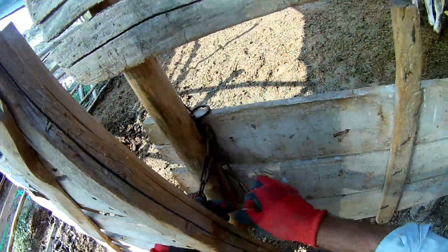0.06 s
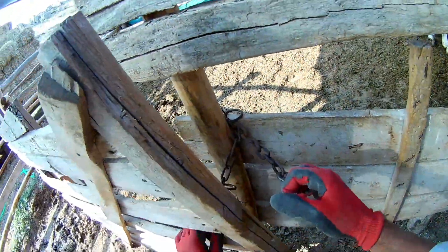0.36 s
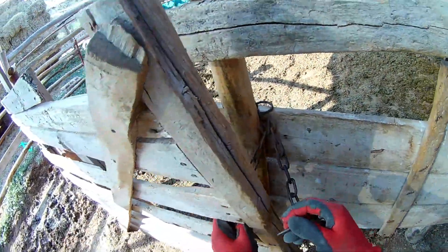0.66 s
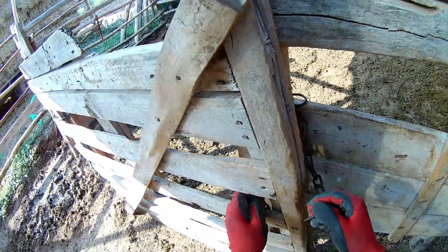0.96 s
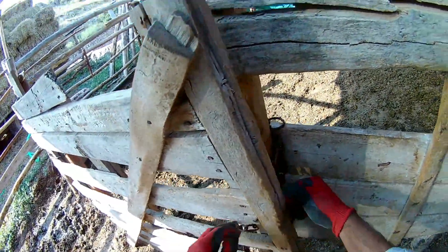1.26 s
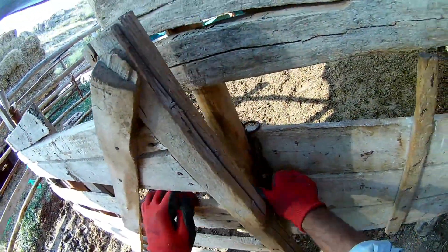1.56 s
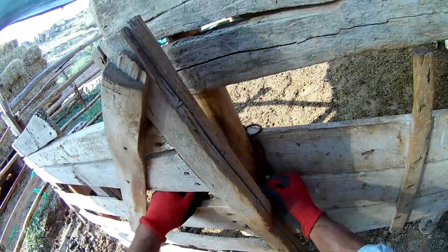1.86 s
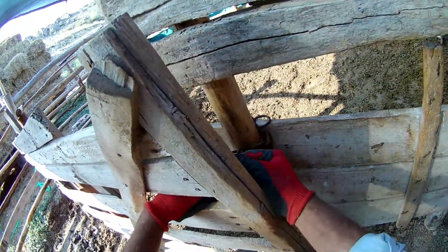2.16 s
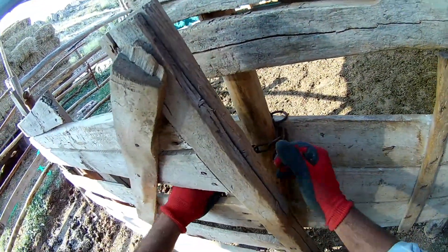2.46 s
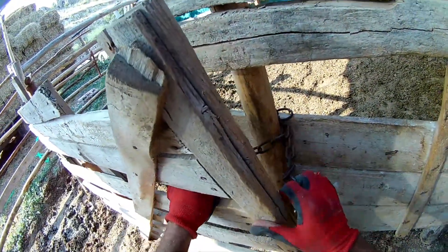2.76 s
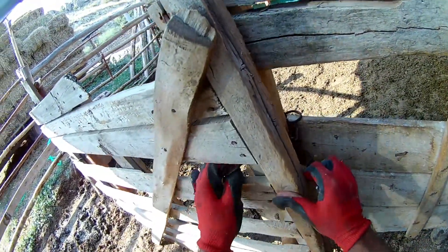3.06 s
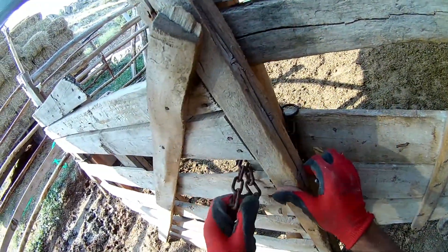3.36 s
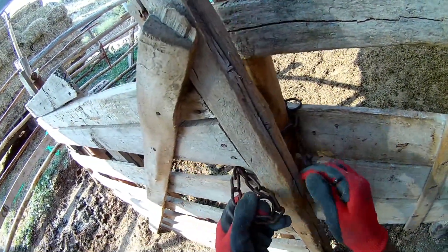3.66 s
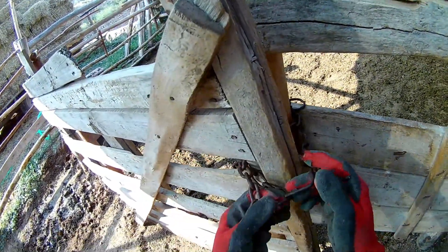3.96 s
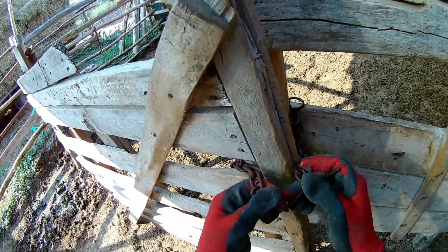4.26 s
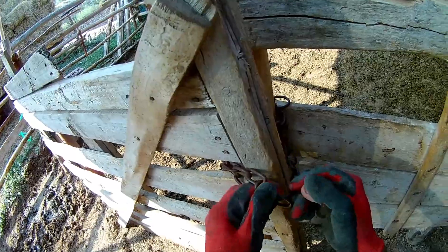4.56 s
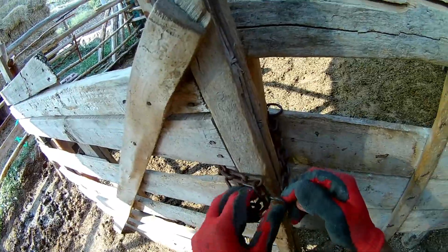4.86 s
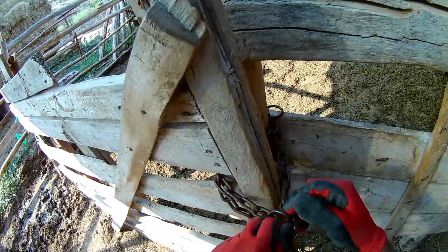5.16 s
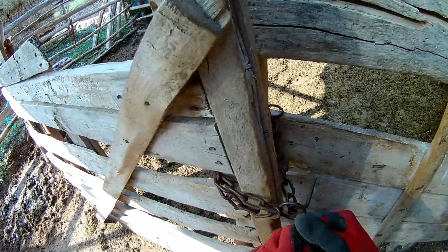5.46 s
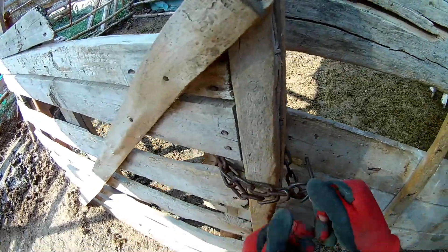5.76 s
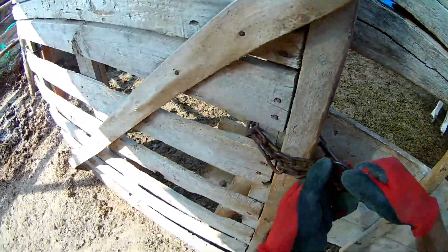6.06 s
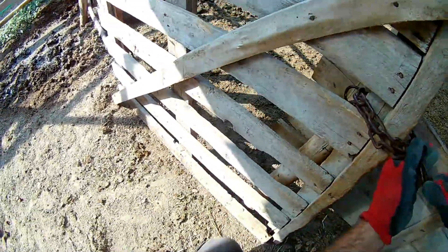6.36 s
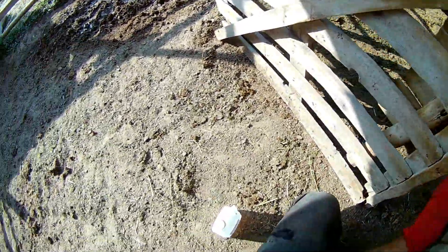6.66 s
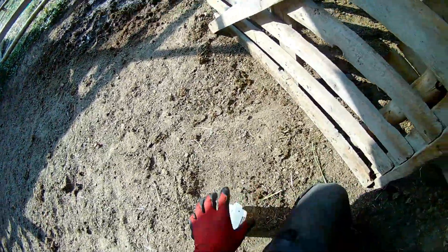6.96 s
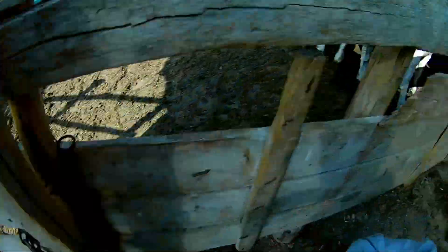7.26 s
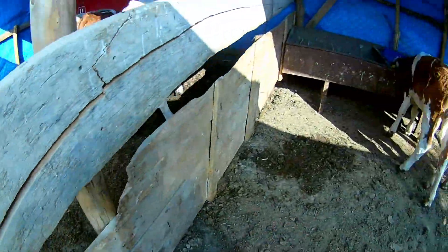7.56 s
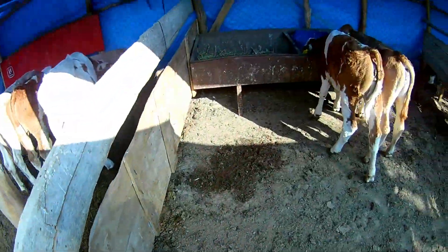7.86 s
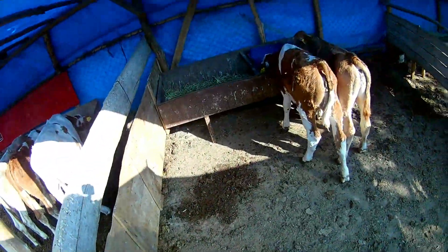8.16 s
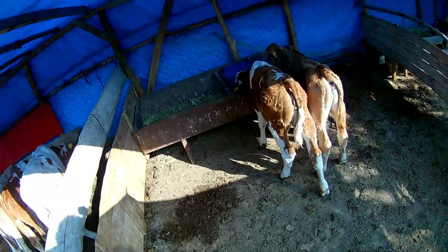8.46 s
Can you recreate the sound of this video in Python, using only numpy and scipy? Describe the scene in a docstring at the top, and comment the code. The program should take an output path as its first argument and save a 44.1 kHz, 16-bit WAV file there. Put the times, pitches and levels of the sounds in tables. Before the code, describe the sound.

Close, irregular clatter of chain links on wooden boards ends in a hook's clank and soft footsteps, over faint birdsong.

```python
"""A plank gate bumps shut in a cattle pen, close by, and a steel chain is threaded through it and hooked.
The links knock and drag on dry, ringing boards and clink on each other while rubber gloves rub.
Metal squeaks once and the hook swings against the gate; then come a few dull steps on earth.
Small birds call in the yard, over a hush, a faint hum, far hoots and puffs of wind on the microphone."""
import sys
import numpy as np
from scipy import signal
from scipy.fft import rfft, irfft
from scipy.io import wavfile
from scipy.ndimage import uniform_filter1d

SR = 44100
rng = np.random.default_rng(int(sys.argv[2]) if len(sys.argv) > 2 else 0)


def wrap_up_sound(samples):
    """Save the sound to the file named by the first command line argument, as 16-bit audio."""
    columns = np.atleast_2d(samples).T
    # keep every value between -1 and 1, then stretch to whole-number steps
    tamed = np.clip(columns, -1, 1)
    steps = np.round(tamed * 32767).astype(np.int16)
    wavfile.write(sys.argv[1], SR, steps)


N = 379304


def amp(db):
    """Decibels to gain."""
    return 10 ** (np.asarray(db) / 20)


def unit_rms(x):
    """Scales to rms 1."""
    return x / np.sqrt(np.mean(x ** 2) + 1e-20)


def unit_peak(x):
    """Scales the loudest two milliseconds to rms 1."""
    return x / np.sqrt(uniform_filter1d(x ** 2, size=88).max() + 1e-20)


def noise(size):
    """White noise."""
    return rng.standard_normal(size)


def decay(t, t60):
    """Envelope that falls 60 dB in t60 seconds."""
    return amp(-60 * t / t60)


def attack(t, rise_s):
    """Envelope that eases up from 0 to 1."""
    return 1 - np.exp(-t / rise_s)


def curve_at(points, hz):
    """Reads a curve on a log-frequency axis."""
    f, value = np.transpose(points)
    return np.interp(np.log(hz + 1), np.log(f + 1), value)


def add(mix, s, sound):
    """Mixes a sound in at time s."""
    part = mix[max(round(s * SR), 0):][:len(sound)]
    part += sound[:len(part)]


def eq(x, points, size=2048):
    """Minimum-phase EQ, so attacks stay sharp."""
    db = curve_at(points, abs(np.fft.fftfreq(size, 1 / SR)))
    log_gain = np.log(amp(np.maximum(db, -100)))
    taps = np.fft.ifft(np.exp(np.conj(signal.hilbert(log_gain)))).real
    return signal.fftconvolve(x, taps)[:len(x)]


def band(x, lo_hz, hi_hz, order=3):
    """Band-pass."""
    return signal.sosfilt(signal.butter(order, [lo_hz, hi_hz], "band", fs=SR, output="sos"), x)


def ringing(modes, t):
    """One dying sine for each row of f/Hz, level/dB, t60/s."""
    hz, db, t60 = np.transpose(modes)[:, :, None]
    return amp(db) * decay(t, t60) * np.sin(2 * np.pi * hz * t)


def dying_noise(t60s, size=12288):
    """Countless weak modes: noise whose bands die at their own speeds."""
    hz, t, spectrum = signal.stft(noise(size), SR, nperseg=256)
    return signal.istft(spectrum * decay(t, curve_at(t60s, hz)[:, None]), SR, nperseg=256)[1][:size]


# EQ of the open-air bed: f/Hz, level/dB
AIR_EQ = [(18, -31), (30, 1), (69, 0.5), (188, -2), (362, -5), (662, -6), (735, -10), (1150, -8.5),
          (1570, -19.5), (2330, -22.5), (2660, -20.5), (7990, -36), (11800, -36.5), (14600, -33),
          (15800, -33.5)]
# partials of the hum: f/Hz, level/dB
HUM_PARTIALS = [(60, -74), (119, -72.5), (183, -70)]
def yard_bed():
    """Open-air hush with a wavering hum of narrow noise bands."""
    hush = amp(-59.5) * unit_rms(eq(noise(N), AIR_EQ))
    hum = sum(amp(db) * unit_rms(band(noise(N), hz - 3, hz + 3, order=2)) for hz, db in HUM_PARTIALS)
    return hush + hum


# hoot cues: t/s, length/s, f/Hz, level/dB
HOOT_CUES = [(5.60, 0.14, 177, -50.5), (6.32, 0.1, 181, -53)]
def hoots():
    """Faint low tones swell and fade far off."""
    out = np.zeros(N)
    for s, length, hz, db in HOOT_CUES:
        t = np.arange(int(length * SR)) / SR
        add(out, s, amp(db) * np.sin(np.pi * t / length) * np.sin(2 * np.pi * hz * t))
    return out


# wind cues: t/s, length/s, level/dB
PUFF_CUES = [(0.785, 0.21, -64), (2.8, 0.082, -60), (3.178, 0.19, -60), (3.52, 0.18, -59),
             (3.985, 0.34, -66), (4.243, .26, -57), (7.14, 0.24, -57.5), (7.793, 0.41, -53)]
def wind():
    """Eddies on the microphone make short puffs of rumble."""
    out = np.zeros(N)
    for s, length, db in PUFF_CUES:
        t = np.arange(int(length * SR)) / SR
        eddies = band(noise(SR), 17, 74.8)[-len(t):]
        add(out, s, amp(db) * unit_rms(np.sin(np.pi * t / length) * eddies))
    return out


def waver(size, smoothing, depth=0.0263):
    """Unsteady pitch, as a factor around 1."""
    return 1 + depth * unit_rms(uniform_filter1d(noise(size), size=smoothing))


# cues for bird peeps and, loudest, a metal squeak: t/s, length/s, f/Hz, level/dB
PEEP_AND_SQUEAK_CUES = [(1.212, 0.018, 4400, -65), (6.215, 0.013, 4500, -52.5), (7.55, .035, 4560, -75),
                        (8.52, 0.047, 4950, -77)]
def peeps_and_squeak():
    """Thin, short whistles around one pitch: faint bird peeps and one brief metal squeak."""
    out = np.zeros(N)
    for s, length, hz, db in PEEP_AND_SQUEAK_CUES:
        t = np.arange(0, length, 1 / SR)
        pitch = hz * waver(SR, smoothing=60)[:len(t)]
        add(out, s, amp(db) * np.sin(np.pi * t / length) ** 2 * np.sin(2 * np.pi * np.cumsum(pitch) / SR))
    return out


# shape of one call, a faint high lead-in and two falling steps: t/s, f/Hz, level/dB
CALL_SHAPE = [(0, 5820, -34.5), (.04, 5380, -18), (.048, 3900, -8), (.077, 4000, -6), (.083, 3380, -7.5),
              (.107, 3230, -3.5), (.145, 2635, -17)]
# call cues: t/s, level/dB, rasp/0-1
CALL_CUES = [(.773, -60, 0.6), (1.326, -50.5, .4), (3.16, -50, .7), (3.851, -58.5, 1), (4.128, -64, 0.85),
             (4.477, -49, 0.14), (5.174, -68, 0.6), (5.479, -56, 0.8), (5.871, -49.5, .26),
             (7.665, -45.5, 0.3), (7.87, -59.5, 1)]
def bird_calls(rasp_hz=470):
    """Small birds sing falling whistles, made harsh by a fast random flutter."""
    out, t = np.zeros(N), np.arange(0, CALL_SHAPE[-1][0], 1 / SR)
    shape_s, shape_hz, shape_db = np.transpose(CALL_SHAPE)
    lowpass = signal.butter(2, rasp_hz, fs=SR, output="sos")
    for s, db, rasp in CALL_CUES:
        pitch = np.interp(t, shape_s, shape_hz) * waver(len(t), smoothing=120)
        whistle = np.exp(2j * np.pi * np.cumsum(pitch) / SR)
        flutter = signal.sosfilt(lowpass, noise(len(t)) + 1j * noise(len(t)))
        roughness = np.sqrt(1 - rasp) + np.sqrt(rasp) * flutter / np.std(flutter)
        add(out, s, amp(db + np.interp(t, shape_s, shape_db)) * (roughness * whistle).real)
    return out


def shed_reverb(x, wet_db=-5, t60=0.25):
    """The sheds around the yard smear a sound with a short tail."""
    tail = dying_noise([(1000, t60), (8000, t60)])
    return x + amp(wet_db) * signal.oaconvolve(x, tail / np.linalg.norm(tail))[:N]


# step and bump cues: t/s, level/dB, f/Hz, half-width/octaves, t60/s
THUD_CUES = [(1.49, -35, 227, 0.53, 0.23), (2.044, -41.5, 214, 0.31, 0.56), (3.171, -29, 167, .45, 0.18),
             (6.256, -34.5, 194, 0.47, 0.13), (7.062, -44.5, 680, .44, .039), (7.239, -37, 480, 1, 0.13),
             (7.49, -37.5, 278, 0.038, .058), (7.715, -36, 267, 0.63, 0.17), (7.721, -39, 1017, 0.92, 0.61),
             (7.749, -35, 129, 1.2, 0.19), (8.023, -46, 897, 0.39, 0.081)]
def thuds(rise_s=0.0042):
    """Bumps and steps on earth: soft blows with a slow attack and a dull decay."""
    out, t = np.zeros(N), np.arange(SR // 2) / SR
    f = np.fft.rfftfreq(len(t), 1 / SR) + 1
    for s, db, hz, octaves, t60 in THUD_CUES:
        body = irfft(rfft(noise(len(t))) / (1 + (np.log2(f / hz) / octaves) ** 4), len(t))
        add(out, s, amp(db) * unit_peak(body * attack(t, rise_s) * decay(t, t60)))
    return out


# glove and sleeve rubs: t/s, length/s, level/dB
RUB_CUES = [(1.92, 0.12, -38), (2.417, 0.13, -40.5), (2.53, 0.2, -44.5), (3.834, 0.098, -43.5),
            (4.393, .15, -45), (4.592, 0.048, -44), (4.658, 0.13, -49.5), (4.834, 0.11, -50.5),
            (5.43, 0.2, -47), (5.716, 0.19, -49), (6.141, 0.087, -46.5), (6.23, 0.12, -46),
            (6.347, 0.12, -47), (6.515, 0.43, -48), (7.829, 0.22, -60)]
# EQ of rubbing rubber: f/Hz, level/dB
GLOVE_EQ = [(100, -9), (400, -6), (800, 0.5), (1000, -1), (1180, 4.5), (1400, -5), (1750, -14), (2700, -21),
            (4000, -36), (6300, -36), (8000, -50)]
def gloves(catch_db=3):
    """Rubber palms slide in short swells, catching and letting go."""
    strokes = np.zeros(N)
    for s, length, db in RUB_CUES:
        add(strokes, s, amp(db) * np.sin(np.linspace(0, np.pi, int(length * SR))))
    catch = amp(catch_db * unit_rms(band(noise(N), 5, 90, order=2)))
    return strokes * unit_rms(eq(noise(N) * catch, GLOVE_EQ))


# fader ride of the chain as it is fed through and drawn tight: t/s, level/dB
FEED_FADER = [(0.0, -51), (0.36, -47), (0.53, -44), (1.05, -50), (1.48, -37), (2.11, -47), (2.25, -53),
              (2.97, -47), (3.09, -44), (3.35, -35.5), (3.52, -36), (3.69, -43), (4.0, -54), (4.24, -68),
              (4.62, -51), (5.39, -56), (6.8, -52.5), (6.95, -61.5), (7.4, -62.5), (8.6, -67)]
def slide_envelope(rise_s=0.0071, fall_s=0.031, scrape_db=-45, follow=0.46, reference_db=-37.5):
    """Gain of the sliding chain: the feed, plus a scrape around each knock that grows with the blow."""
    t = np.arange(-.2, .3, 1 / SR)
    swell = np.exp(np.minimum(t / rise_s, -t / fall_s))
    power = amp(np.interp(np.arange(N) / SR, *np.transpose(FEED_FADER))) ** 2
    for s, db, *_ in KNOCK_CUES:
        scrape = amp(scrape_db + follow * (db - reference_db)) * swell
        before_start = max(-round((s + t[0]) * SR), 0)
        add(power, s + t[0], scrape[before_start:] ** 2)
    return np.sqrt(power)


# resonances of the boards, dragged on or struck: f/Hz, level/dB, t60/s
BOARD_MODES = [(185.2, -8.5, 0.56), (227.6, -13.5, 0.22), (286, -7, 0.17), (374, -0.5, 0.04),
               (482, -7.5, 0.18), (526, 12, 0.092), (583, 2, 0.72), (690, -17.5, 0.048), (795, 8, 0.14),
               (789, 1, 0.11), (910, -20.5, 0.088), (995, -7, 0.11), (1140, 13.5, 0.13), (1185, -7, 0.063),
               (1350, -3, 0.23), (1490, -4.5, 0.085), (1513, -1, 0.06), (1700, -21, 0.077),
               (2034, 0.5, 0.091), (2240, -3.5, 0.034), (2770, -8, 0.14), (3220, -20, 0.021)]
# EQ of any blow on the gate: f/Hz, level/dB
WOOD_EQ = [(59, -60), (100, -14), (221, -10.5), (374, -5), (486, -4), (576, -7), (808, 0.5), (1500, -5),
           (1720, -8), (1960, -12.5), (2800, -25), (3140, -29), (4240, -34.5), (5840, -35.5), (9000, -60.5),
           (11700, -99), (19800, -120)]
# EQ of crackling rust: f/Hz, level/dB
RUST_EQ = [(1500, -21.5), (3000, -16), (5000, 7.5), (6500, 7.5), (8000, -9), (11000, 2.5), (15000, -23.5)]
def chain_drag(slide, grains_per_s=700, grain_t60=0.023, boards_db=-19, rust_db=-35, spot_count=8):
    """Sliding links catch on the grain of the wood in many tiny blows; flakes of rust crackle."""
    blows = amp(3 * np.minimum(rng.exponential(1, N), 3)) * (rng.random(N) < grains_per_s / SR)
    spots, t = rng.integers(0, spot_count, N), np.arange(SR // 10) / SR
    boards, grains = ringing(BOARD_MODES, t), np.zeros(N)
    for spot in range(spot_count):
        scuff = unit_rms(noise(len(t)) * decay(t, grain_t60))
        hollow = amp(boards_db) * unit_rms(noise(len(boards)) @ boards)
        grains += signal.oaconvolve(blows * (spots == spot), scuff + hollow)[:N]
    wood = unit_rms(band(eq(grains, WOOD_EQ), 81, 3600, order=2))
    flakes = signal.oaconvolve(blows * (spots == 0), noise(len(t)) * np.exp(-t / 0.0028))[:N]
    return (wood + amp(rust_db) * unit_rms(eq(flakes, RUST_EQ))) * slide


def chain_rattle(slide, per_s=6, over_slide_db=6, spread_db=2.5, centre_hz=1100, octaves=.35, tries=160):
    """Loose links knock lightly at random moments, as strong as the slide that shakes them."""
    cues, thud_db, crack_db = [], -27.5, -21
    for when, force, spot, chance in rng.random((tries, 4)):
        if chance < per_s * N / SR / tries:
            at = when * (N - 1)
            db = 20 * np.log10(slide[int(at)]) + over_slide_db + spread_db * (2 * force - 1)
            hz = centre_hz * 2 ** (octaves * (2 * spot - 1))
            cues.append((at / SR, db, hz, thud_db, crack_db))
    return knocks(cues)


# resonances of a steel link: f/Hz, level/dB, t60/s
LINK_MODES = [(7400, 6.5, 0.236), (7500, -7, 0.059), (10480, -6, .06), (11500, 5, 0.044),
              (10930, 0.5, 0.28), (11900, 9.5, 0.02), (13340, 0.5, .05), (14260, -9.5, .05),
              (14450, -8, 0.019)]
# EQ of bare steel contact: f/Hz, level/dB
TICK_EQ = [(1500, -49), (3000, 9), (5800, 14.5), (7500, -4.5), (11000, -7), (15000, -10)]
# link-on-link cues: t/s, level/dB, ring focus f/Hz, t60/s of the gloves' damping
CLINK_CUES = [(.068, -56, 14100, 0.099), (.085, -64, 11070, 0.081), (.155, -59.5, 10700, 0.045),
              (.289, -61, 14200, 0.065), (.36, -53.5, 10400, 0.032), (.635, -74, 7500, 0.02),
              (.664, -73, 7500, 0.019), (0.706, -69, 7500, 0.02), (1.372, -63, 7750, 0.065),
              (1.388, -58, 14040, .1), (1.422, -51.5, 14300, 0.053), (1.456, -56, 14200, 0.045),
              (1.551, -65, 14200, .036), (1.615, -62, 14200, .12), (1.686, -59, 14100, 0.092),
              (1.765, -65, 14300, 0.12), (1.94, -56.5, 10740, 0.075), (2.086, -67, 10400, .03),
              (2.215, -63, 7400, 0.033), (2.359, -63.5, 10600, 0.032), (2.452, -59.5, 14300, 0.054),
              (2.475, -58, 14100, 0.11), (2.663, -57, 14000, 0.057), (2.771, -60, 7500, 0.62),
              (2.935, -60, 14200, 0.044), (3.035, -73, 7500, .6), (3.276, -55, 10800, 0.034),
              (3.286, -71, 7500, .5), (3.316, -65, 10500, 0.024), (3.432, -63.5, 10400, 0.021),
              (3.586, -64.5, 10500, 0.018), (3.608, -67, 10400, 0.016), (3.799, -69.5, 7500, 0.017),
              (4.614, -44.5, 12000, 0.1), (5.533, -44.5, 10400, 0.071), (6.16, -64, 10500, 0.045),
              (6.175, -68, 10600, .04), (6.429, -71, 10400, .027), (6.606, -61, 14200, 0.065),
              (6.697, -46.5, 10000, 0.1), (6.702, -58, 14300, .1), (6.725, -57.5, 11300, .9),
              (6.827, -65, 10800, 0.029)]
def chain_clinks(focus_width_hz=450, tick_t60=0.016, detune=0.0037, contact_s=0.00081):
    """Rusty links meet with a dry tick and a rough ring; links that only rub swell into the ring."""
    out, t = np.zeros(N), np.arange(SR // 4) / SR
    mode_hz = np.transpose(LINK_MODES)[0]
    for s, db, hz, grip_t60 in CLINK_CUES:
        hardness_db = max(13.5 - 10.5 * np.log2(grip_t60 / 0.029), -11)  # tighter grip, more tick
        weights = rng.uniform(.6, 1.3, len(mode_hz)) / (1 + ((mode_hz - hz) / focus_width_hz) ** 2)
        tick = eq(noise(len(t)) * attack(t, 0.00033) * decay(t, tick_t60), TICK_EQ)
        modes = weights @ ringing(LINK_MODES, t * (1 + detune * rng.standard_normal()))
        progress = t / (contact_s * amp(-.8 * hardness_db))  # softer tick, longer contact
        friction = progress * np.exp(-progress) * noise(len(t))
        ring = signal.fftconvolve(modes * decay(t, grip_t60), friction)[:len(t)]
        add(out, s, amp(db) * (unit_peak(ring) + amp(hardness_db - 1) * unit_peak(tick)))
    return out


# resonances of the hook: f/Hz, level/dB, t60/s
HOOK_MODES = [(591, -12, 0.11), (747, 11.5, 0.024), (1324, -11, 0.2), (1550, -9, 0.026), (2843, 0, 0.057),
              (3040, -9, 0.039)]
# hook cues: t/s, level/dB
HOOK_CUES = [(6.8195, -29), (6.8425, -17), (6.8465, -26.5)]
def hook():
    """The hook, let go, swings against the gate and rings freely."""
    out, t = np.zeros(N), np.arange(SR // 4) / SR
    clank = unit_peak(ringing(HOOK_MODES, t).sum(0) * attack(t, 0.00023))
    for s, db in HOOK_CUES:
        add(out, s, amp(db) * clank)
    return out


# ring-out of the whole gate and fence: f/Hz, t60/s
FENCE_DECAY = [(150, 1), (400, 0.47), (1000, 0.14), (2800, 0.23), (7000, 0.027)]
# chain and gate strike wood: t/s, level/dB, struck spot f/Hz, thud level/dB, crack level/dB
KNOCK_CUES = [(0.075, -36, 1490, -2, -19), (.113, -24, 1496, -36, -26), (.123, -39, 1010, -27, -25),
              (0.154, -42, 770, -2, -9), (.289, -31, 613, -3, -14), (0.338, -26, 1060, -7, -23),
              (0.346, -25, 807, -5, -27), (0.363, -26.5, 701, -3.5, -12), (0.376, -25, 1390, -29, -19),
              (.386, -19.5, 1220, -23, -25), (.423, -27.5, 1400, -27, -27), (0.455, -25, 1490, -8, -16),
              (.587, -36.5, 756, -22, -17), (.635, -28, 1063, -27, -13), (0.679, -28, 1087, -21, -24),
              (0.708, -20, 1167, -16, -12.5), (.727, -25, 1700, -15, -16), (.739, -19, 965, -33, -17.5),
              (0.758, -16.5, 1260, -44, -15.5), (0.87, -34.5, 1000, -21, -25),
              (.917, -20, 1324, -11.5, -8.5), (.934, -21, 784, -25, -32), (.964, -18, 1323, -20.5, -9.5),
              (.986, -28, 712, -24, -22), (1.016, -26.5, 1260, -24, -37), (1.036, -27.5, 1065, -23, -8),
              (1.061, -30, 1430, -6.5, -14), (1.153, -23, 1636, -33, -25),
              (1.247, -22.5, 1310, -16.5, -17.5), (1.331, -25.5, 890, -18, -24),
              (1.419, -23.5, 820, -9.5, -14.5), (1.449, -26.5, 877, -10, -20), (1.489, -15, 566, -7.5, -36),
              (1.496, -15.5, 1166, -18, -19.5), (1.52, -16.5, 1172, -22, -28),
              (1.538, -20.5, 1166, -18, -30), (1.556, -24.5, 890, -6, -39), (1.575, -29, 857, -9, -41),
              (1.712, -22, 840, -21, -20), (1.731, -22.5, 940, -11, -11.5), (1.745, -20, 1195, -14, -22),
              (1.84, -27.5, 760, -12, -22), (2.044, -16, 857, -13, -32), (2.053, -17.5, 872, -11.5, -27),
              (2.066, -24, 784, -18, -37), (2.119, -9, 1610, -35.5, -14), (2.173, -23.5, 1135, -33, -13),
              (2.192, -18.5, 1650, -33, -15), (2.215, -21.5, 1060, -25, -8), (2.307, -40.5, 1140, -6, -22),
              (2.525, -24.5, 1206, -22, -22), (2.683, -27, 1220, -8, -21), (2.907, -15, 1430, -43, -22),
              (2.926, -19.5, 1420, -39, -24), (2.95, -17, 1550, -26, -15), (2.987, -20.5, 1057, -18, -30),
              (3.08, -29, 1140, -6.5, -14.5), (3.113, -32, 1170, -8, -20), (3.169, -24, 548, -5, -17),
              (3.202, -16.5, 1160, -10, -13.5), (3.257, -18.5, 1092, -10.5, -25),
              (3.275, -20.5, 1053, -19, -17), (3.285, -21, 1507, -30, -32), (3.316, -26.5, 1170, -15, -9.5),
              (3.342, -21, 1480, -26, -17.5), (3.379, -19.5, 1330, -33, -22.5),
              (3.418, -24.5, 974, -27, -8.5), (3.427, -18.5, 1343, -9.5, -34),
              (3.434, -19.5, 868, -24, -16), (3.48, -23.5, 806, -11, -11), (3.56, -23.5, 1216, -36, -10),
              (3.565, -24, 1755, -36, -18.5), (3.583, -25.5, 1120, -14, -17),
              (3.606, -16.5, 1015, -15.5, -10.5), (3.637, -24.5, 943, -12, -12.5),
              (3.658, -25.5, 1306, -27, -13), (3.685, -27, 1050, -25, -11.5),
              (3.703, -26.5, 1220, -18, -18), (3.877, -37.5, 1200, -13, -4), (4.185, -41.5, 1680, -18, -3),
              (4.272, -31, 1150, -18, -27), (4.5, -20, 1160, -27, -20), (4.621, -34.5, 1000, -13, -22),
              (4.958, -33.5, 1340, -20, -22), (5.072, -34.5, 1290, -9, -7), (5.1, -24.5, 1030, -30, -8),
              (5.534, -29.5, 840, -7, -26), (6.039, -35, 1467, -6.5, -12), (6.176, -31, 1156, -27, -16),
              (6.254, -29.5, 516, -11, -17.5), (6.608, -29.5, 1375, -12, -8.5),
              (6.642, -32, 1303, -24, -22), (6.684, -37, 1250, -10, -5), (6.703, -28, 602, -4.5, -11),
              (6.819, -23, 1360, -16, -25), (6.844, -20, 1370, -11, -7.5)]
def knocks(cues, mid_hz=1100, upper_mode_hz=2412, hard_db=-15.5, detune=0.012):
    """Each blow rings two modes of the struck spot briefly, then the boards and the fence around them."""
    out, t = np.zeros(N), np.arange(12288) / SR
    boards, onset = ringing(BOARD_MODES, t), attack(t, 0.0001)
    for s, db, hz, thud_db, crack_db in cues:
        # hard blows pin the link to the wood, and stiff, high spots die sooner
        sustain = max(0.99 - 0.13 * max(db - hard_db, 0) - 0.11 * np.log2(hz / mid_hz), .2)
        spot_t60, near_t60, contact_t60 = sustain * np.array([0.029, 0.1, 0.068])
        upper_hz = upper_mode_hz * (1 + 0.12 * rng.standard_normal())
        spot, upper = ringing([(hz, 0, spot_t60), (upper_hz, 0, spot_t60)], t)
        # boards tuned near the struck spot take up its ring and beat against it
        near = ringing([(hz * ratio, -13, near_t60) for ratio in rng.uniform(.9, 1.2, 2)], t)
        tone = amp(4) * unit_peak((spot + near[0] - near[1]) * onset)
        contact = amp(-2) * unit_peak(eq(noise(len(t)) * decay(t, contact_t60), WOOD_EQ))
        modes = noise(len(boards)) @ boards  # every spot stirs the modes differently
        modes = np.interp(t * (1 + detune * rng.standard_normal()), t, modes)  # no two boards are alike
        fence = eq(dying_noise(FENCE_DECAY), WOOD_EQ)
        tail = amp(-12) * unit_peak(fence) + amp(-13) * unit_peak(modes)
        blow = onset * (contact + sustain ** 2 * tail)
        low_cut_hz = 575 * (hz / mid_hz) ** 0.54  # a stiffer spot gives less bass
        body = unit_peak(band(blow + tone, low_cut_hz, 1930))
        thud = amp(thud_db - 2) * unit_peak(band(blow, 140, 506))  # heavy blows move the whole gate
        edge = unit_peak(band(blow, 1840, 4800, order=2)) + amp(1) * unit_peak(band(upper, 1800, 4100))
        crack = amp(crack_db) * unit_peak(band(edge, 1600, 19000))  # hard edges crack
        add(out, s, amp(db) * (body + thud + crack))
    return out


def scene():
    """The mono mix, heard from just above the hands."""
    slide = slide_envelope()
    hits = amp(-3) * knocks(KNOCK_CUES) + amp(-4.5) * hook() + amp(-3) * chain_clinks()
    movement = amp(-4) * chain_drag(slide) + gloves() + amp(-4.5) * thuds()
    ambience = shed_reverb(bird_calls() + peeps_and_squeak()) + yard_bed() + hoots() + wind()
    return (ambience + movement + chain_rattle(slide) + hits)[None]


def record(dry, cutoff_hz=15850):
    """A steep high cut on the whole mix."""
    lowpass = signal.firwin(511, cutoff_hz, window=("kaiser", 9), fs=SR)
    return signal.oaconvolve(dry, lowpass[None], "same")


dry = scene()
out = record(dry)
wrap_up_sound(out)
```